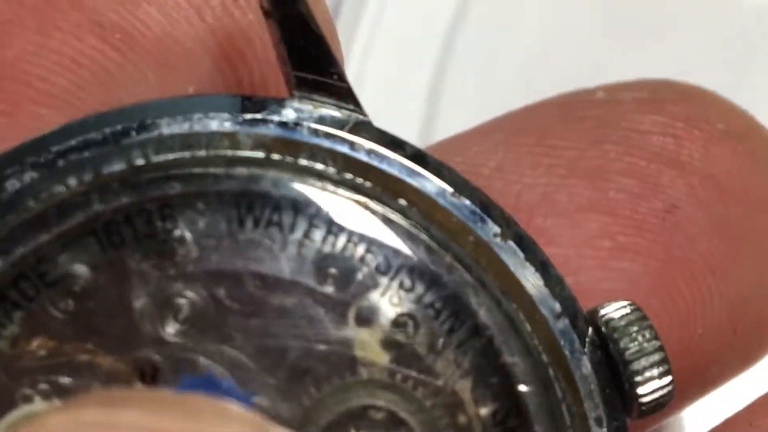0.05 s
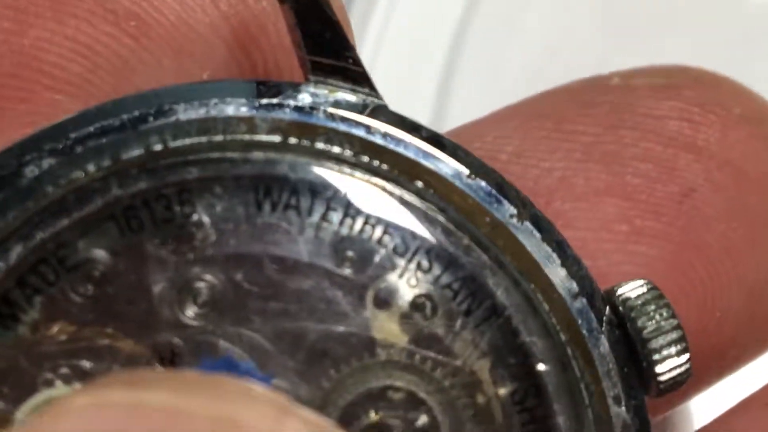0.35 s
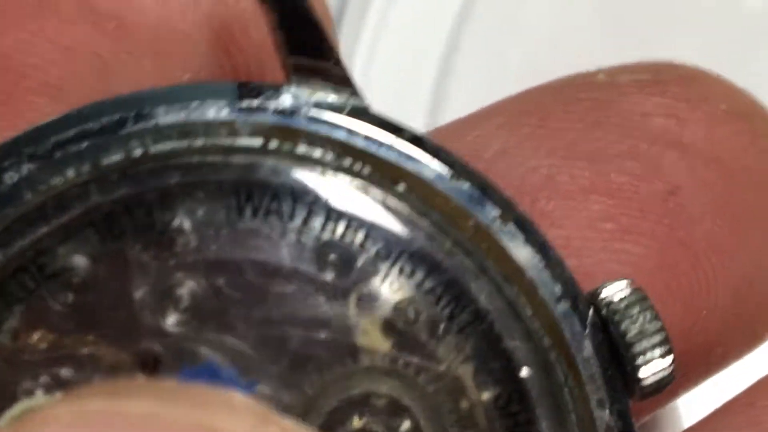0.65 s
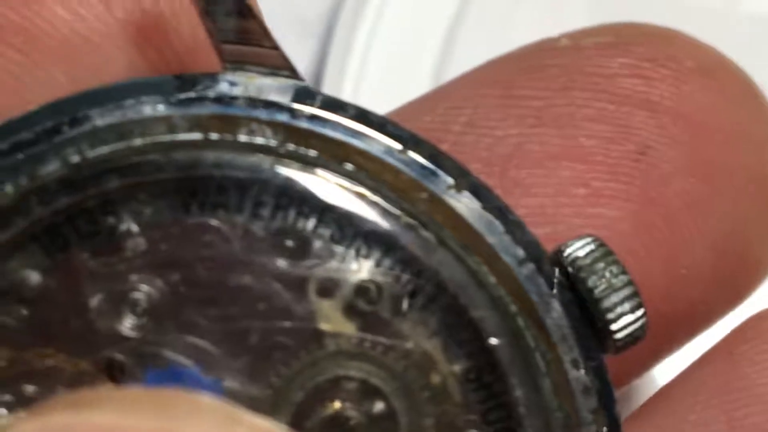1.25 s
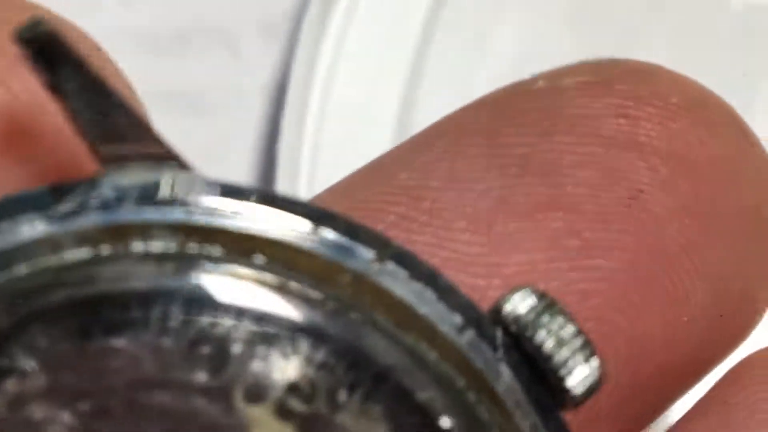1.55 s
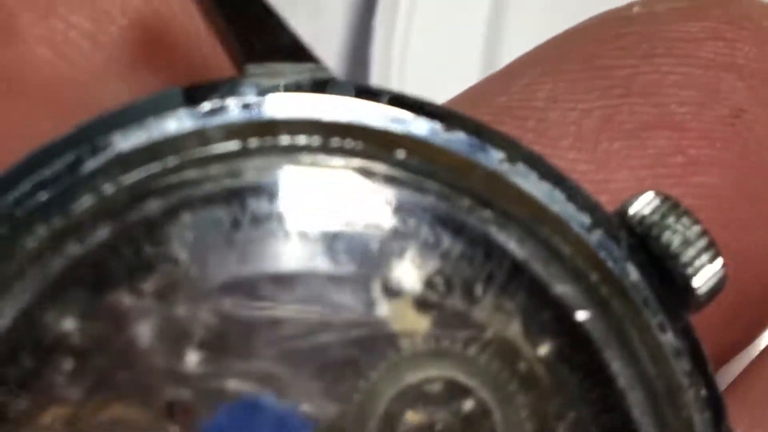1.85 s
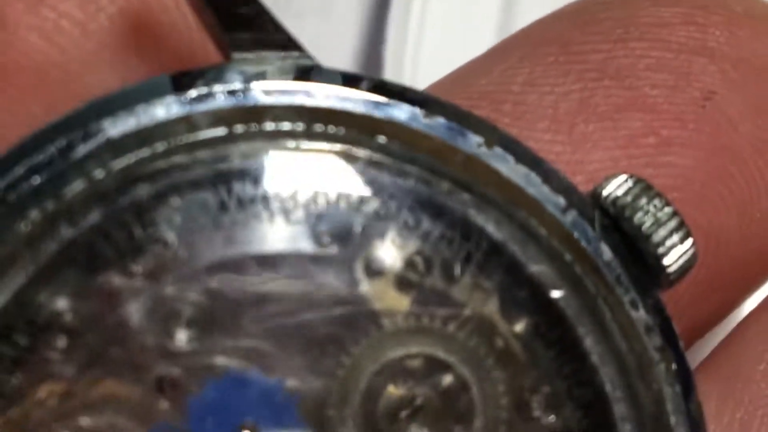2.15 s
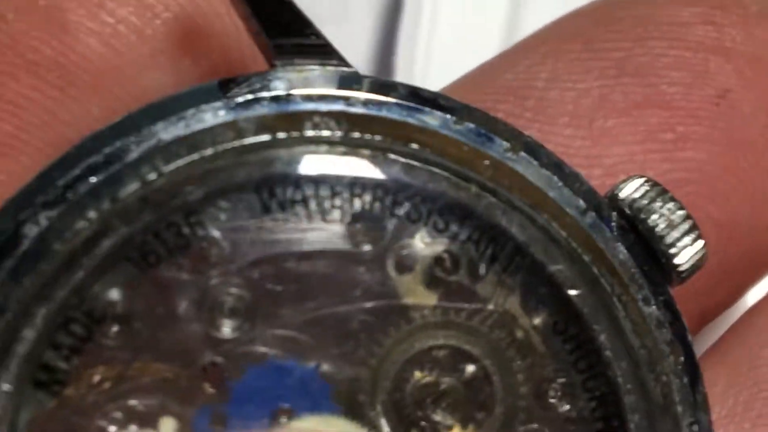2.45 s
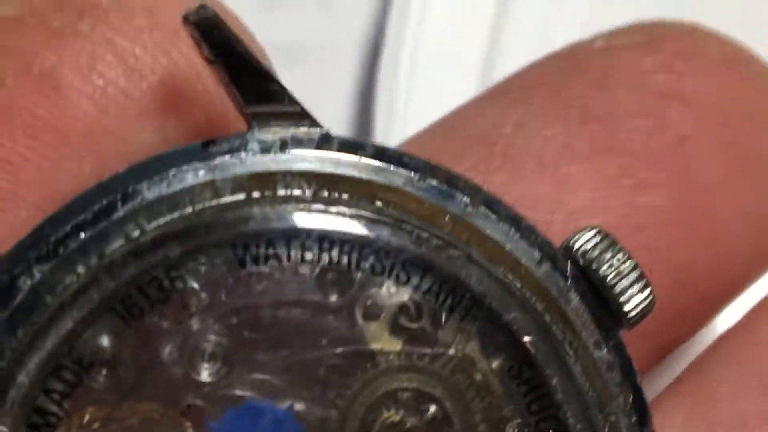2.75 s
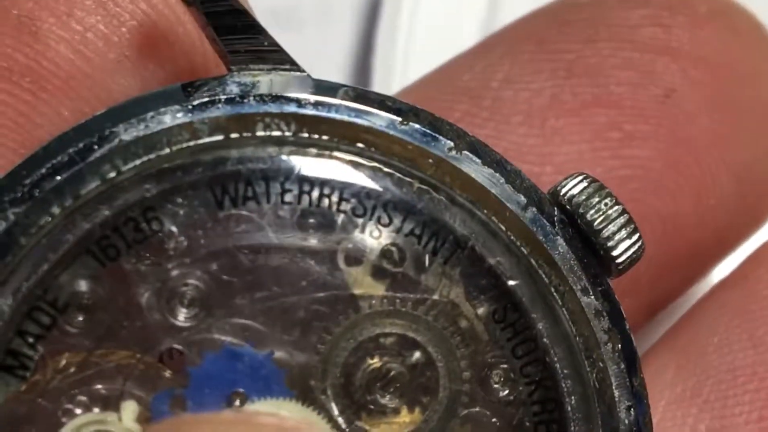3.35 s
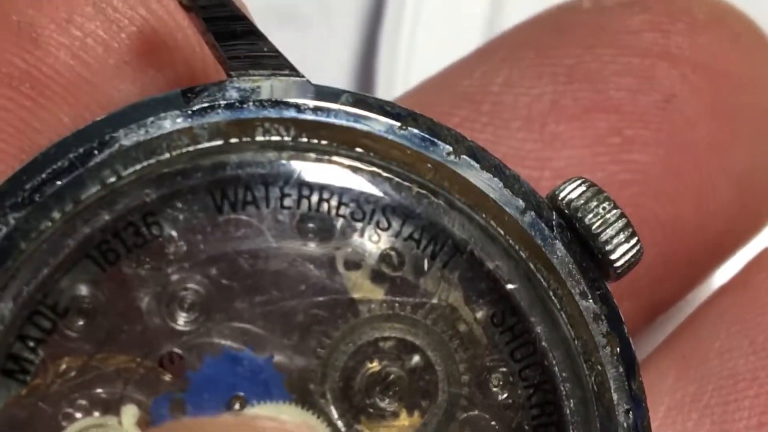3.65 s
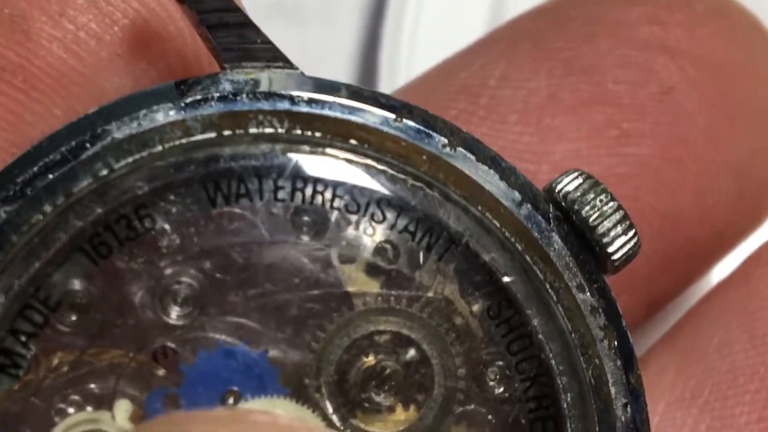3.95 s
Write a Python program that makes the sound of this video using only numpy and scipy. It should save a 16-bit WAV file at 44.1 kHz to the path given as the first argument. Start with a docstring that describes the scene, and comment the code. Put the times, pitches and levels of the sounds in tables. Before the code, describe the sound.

A mechanical wristwatch ticks close to the microphone, five light metallic beats a second, never pausing. A finger slides faintly over the case once, while low electrical hum and ventilation fill the quiet room.

```python
"""Wristwatch in a quiet room

A mechanical watch, held in the fingers close to the microphone, beats five times a second. In each
beat three tiny contacts of the escapement (unlock, impulse, lock) ring the steel case; tick and tock
differ. A finger slides softly on the case once. Behind it lie mains and motor hum and the ventilation."""
import sys
import numpy as np
from scipy import signal
from scipy.fft import rfft, irfft
from scipy.io import wavfile
from scipy.ndimage import uniform_filter1d

SR = 44100
rng = np.random.default_rng(int(sys.argv[2]) if len(sys.argv) > 2 else 0)


def materialize(psi):
    """Save the field psi as 16-bit PCM at rate SR to the path in sys.argv[1].

    A 1-D psi becomes a single channel; in a 2-D psi each row is a channel.
    """
    bounded = np.clip(np.atleast_2d(psi).T, -1, 1)
    quanta = np.round(bounded * 32767).astype(np.int16)
    wavfile.write(sys.argv[1], SR, quanta)


N = 176400

# ringing modes of case and movement: pitch_hz, width_hz, tick_gain_db, tock_gain_db
CASE_MODES = [(4000, 1600, -20, -3), (4600, 330, -19, -9.5), (5330, 190, -9, -3), (5830, 160, -6.5, -6.5),
              (6570, 180, -13, -8.5), (6980, 350, -6.5, -11), (7910, 140, -7, -10), (8700, 350, -1, -8),
              (9620, 180, -1, -4.5), (10450, 300, -15, -25), (11680, 290, -2, -4.5), (12450, 400, 2, -2.5),
              (12900, 240, -13, -9), (13550, 290, -1, -1), (13950, 350, -4.5, -8), (14250, 590, -3, -22),
              (15800, 800, -7, -1.5)]


def amp(db):
    """Decibels to gain."""
    return 10 ** (np.asarray(db) / 20)


def unit(x):
    """Scales to an rms of one."""
    return x / np.sqrt(np.mean(x ** 2) + 1e-30)


def spectrum_db(points, hz):
    """Interpolates a spectrum along a log-frequency axis."""
    point_hz, db = np.transpose(points)
    return np.interp(np.log(hz + 1), np.log(point_hz), db)


def peak_power(peaks, hz):
    """Summed power of a few resonances."""
    return sum((amp(db) / (1 + 2 * ((hz - centre) / width) ** 2)) ** 2 for centre, width, db in peaks)


def add(mix, start_s, sound):
    """Mixes a sound in at start_s."""
    part = mix[max(round(start_s * SR), 0):][:len(sound)]
    part += sound[:len(part)]


def shaped_noise(gain):
    """White noise weighted by one gain per frequency bin."""
    return irfft(rfft(rng.standard_normal(N)) * gain, N)


def drift(rate_hz):
    """Slow random motion with an rms of one."""
    hz = np.fft.rfftfreq(N, 1 / SR)
    return unit(shaped_noise(np.exp(-(hz / rate_hz) ** 2)))


def hum(waver_db=0.52):
    """Steady mains and motor tones in the room; the higher ones waver more in pitch."""
    # mains and motor tones: pitch_hz, rms_db
    tones = [(71.1, -72), (94.75, -50), (120.02, -47.5), (240.07, -66), (260.57, -66), (360.07, -60),
             (521.1, -68.5), (1383.5, -85), (1596.2, -84), (2293.6, -78), (3361, -88.5)]
    out = np.zeros(N)
    for hz, db in tones:
        pitch_waver = .0006 * np.sqrt(hz / 2300) * drift(4.3)
        turns = np.cumsum(hz * (1 + pitch_waver)) / SR + rng.random()
        out += np.sqrt(2) * amp(db + waver_db * drift(1.3)) * np.sin(2 * np.pi * turns)
    return out


def room_air(gain_db=0.5, waver_db=0.33):
    """Room tone: dull ventilation noise with a few resonances."""
    # broad spectrum of the air: frequency_hz, relative_density_db
    floor = [(15, -116), (26, -102), (38, -83), (65, -73), (140, -78), (225, -77), (275, -91.5), (330, -81),
             (410, -84), (600, -85), (780, -91.5), (930, -89.5), (1080, -96.5), (1450, -96.5),
             (1650, -94.5), (2250, -97), (2800, -104), (3200, -102), (3550, -106), (4100, -106.5),
             (4850, -114), (5600, -112), (6900, -115.5), (7600, -119.5), (8800, -118), (9900, -121),
             (10400, -126), (11100, -122.5), (12500, -123), (14500, -126), (16000, -126)]
    # resonances of room and ventilation: centre_hz, width_hz, relative_density_db
    resonances = [(162, 8.1, -79), (194, 7.3, -78), (599.4, 13, -80), (700, 16, -82.5), (874, 15, -87.5),
                  (1184, 26, -89.5)]
    hz = np.fft.rfftfreq(N, 1 / SR)
    power = amp(spectrum_db(floor, hz)) ** 2 + peak_power(resonances, hz)
    noise = shaped_noise(np.sqrt(power * SR / 2))
    return noise * amp(gain_db + waver_db * drift(4.2))


def ventilation_drone(gain_db=-0.95, smooth_samples=9000):
    """Low, steady band of ventilation noise near 350 Hz, with slight random level wander."""
    # resonances of the drone: centre_hz, width_hz, gain_db
    resonances = [(329.3, 22, -5.5), (350, 15, 0.5), (382, 15, -6)]
    # slight chance wander of its level: time_s, relative_level_db
    level_wander = [(0.0, -55), (0.33, -52), (0.67, -50.5), (1.0, -53.4), (1.33, -54), (1.67, -54.5),
                    (2.0, -51.5), (2.33, -54), (2.67, -52), (3.0, -54), (3.33, -52), (3.67, -51),
                    (4.0, -54)]
    hz = np.fft.rfftfreq(N, 1 / SR)
    noise = unit(shaped_noise(np.sqrt(peak_power(resonances, hz))))
    steady = noise / np.sqrt(uniform_filter1d(noise ** 2, smooth_samples))
    wander_db = np.interp(np.arange(N) / SR, *np.transpose(level_wander))
    return steady * amp(gain_db + wander_db)


def contact(mode_db, rise_s, hold_s, decay_s, spread_db=1.5, size=1024):
    """Steel meets jewel: a brief, uneven chatter of micro-impacts rings every mode of the case."""
    t = np.arange(size) / SR
    force = np.minimum(t / rise_s, 1) * np.exp(-np.maximum(t - rise_s - hold_s, 0) / decay_s)
    uneven = amp(spread_db * unit(uniform_filter1d(rng.standard_normal(size), size=14)))
    out = np.zeros(size)
    for (hz, width, _, _), db in zip(CASE_MODES, mode_db):
        chatter = force * uneven * rng.standard_normal(size)
        pole = np.exp((2j * np.pi * hz - np.pi * width) / SR)
        ring = signal.lfilter([1, -1], np.poly([pole, pole.conjugate()]).real, chatter)
        out += amp(db) * unit(ring)
    return unit(out) * np.sqrt(.0087 * SR / size)  # the energy of 8.7 ms at an rms of one


def escapement(gain_db=-4, unlock_db=-21, settle_db=-31, light_hold_s=.0002, firm_hold_s=.001):
    """Close to the microphone: unlock, impulse and the loud lock, on entry and exit pallets in turn."""
    # tick and tock in turn: lock_s, relative_level_db, impulse_re_lock_db, low_mode_lift_db,
    # struck_mode_hz, struck_mode_lift_db
    beats = [(.1386, -56, -8, 6, 11680, 9), (.3392, -55, -5, 0, 12900, 1),
             (.5389, -52.5, -12, 4.5, 13550, 10.5), (.7392, -55, -8, 0.5, 5830, -2),
             (.9386, -55, -6, 3, 11680, 5), (1.1394, -55.5, -9, -1, 9620, 3),
             (1.3390, -53.5, -8, 5, 13950, 12.5), (1.5394, -54.5, -9, -2, 12900, 5),
             (1.7390, -53.5, -10, 0, 12900, 4), (1.9394, -54, -8, -2, 12450, 2),
             (2.1393, -52, -9, -0.5, 10450, 13), (2.3394, -55.5, -8, -1.5, 12450, 3),
             (2.5394, -52, -15, -3, 12450, 4), (2.7397, -52, -6.5, 2, 9620, 11),
             (2.9394, -53, -9, 0, 9620, 1), (3.1398, -53.5, -9, -1, 12450, 6),
             (3.3394, -53.5, -8, 1, 13950, -1), (3.5398, -55, -7, -2, 9620, 6),
             (3.7396, -53, -13, -2, 9620, 3), (3.9399, -53.5, -6, -1, 5330, 1)]
    # time ahead of the lock, tick then tock: unlock_lead_s, impulse_lead_s
    leads = [(.0170, .0091), (.0166, .0112)]
    # shape of the chatter, tick then tock: rise_s, decay_s
    strokes = [(.0004, 0.0016), (.0009, .0009)]
    # a small slip in the wheel train: start_s, relative_level_db
    slips = [(2.1712, -70)]
    out = np.zeros(N)
    modes = np.array(CASE_MODES)
    mode_hz = modes[:, 0]
    for k, (lock_s, db, impulse_db, low_db, struck_hz, lift_db) in enumerate(beats):
        side = k % 2  # 0 tick, 1 tock
        unlock_lead, impulse_lead = leads[side]
        rise, decay = strokes[side]
        colour = modes[:, 2 + side] + low_db * (mode_hz < 7500)
        colour[np.argmin(abs(mode_hz - struck_hz))] += lift_db
        add(out, lock_s - unlock_lead, amp(db + unlock_db) * contact(colour, rise, light_hold_s, decay))
        add(out, lock_s - impulse_lead, amp(db + impulse_db) * contact(colour, rise, light_hold_s, decay))
        add(out, lock_s, amp(db) * contact(colour, rise_s=.00014, hold_s=firm_hold_s, decay_s=decay))
        if side == 0:  # the wheels settle faintly after a tick
            settle_gain = amp(db + settle_db + 1.5 * rng.standard_normal())
            add(out, lock_s + .0325, settle_gain * contact(colour, rise, firm_hold_s, decay))
    for start_s, db in slips:
        add(out, start_s, amp(db) * contact(modes[:, 2], rise_s=.0006, hold_s=.001, decay_s=.003))
    return amp(gain_db) * out


def reflections(sound, gain_db=-15, t60_s=0.05, size=6000):
    """Faint quick reflections from the hand and desk nearby."""
    tail = rng.standard_normal(size) * amp(-60 * np.arange(size) / SR / t60_s)
    return amp(gain_db) * signal.fftconvolve(sound, tail / np.linalg.norm(tail))[:N]


def finger_slide(rough_db=0.5, grain_hz=70):
    """Skin slides over the case, close up: a soft, slightly uneven hiss."""
    # rise and fall of the slide: time_s, level_db
    stroke = [(1.2, -90), (1.35, -74.5), (1.5, -70.5), (1.6, -71), (1.75, -75.5), (1.95, -95)]
    # spectrum of skin on steel: frequency_hz, gain_db
    colour = [(1500, -44), (2900, -4), (3700, 6), (5300, -10.5), (6700, -4), (7700, -12), (8900, -6.5),
              (10500, -17), (11400, -14), (14000, -25), (15500, -13)]
    hz = np.fft.rfftfreq(N, 1 / SR)
    hiss = unit(shaped_noise(amp(spectrum_db(colour, hz))))
    stroke_db = np.interp(np.arange(N) / SR, *np.transpose(stroke))
    return hiss * amp(stroke_db + rough_db * drift(grain_hz))


def scene():
    """One microphone: the watch in front, the room behind."""
    watch = escapement()
    foreground = watch + reflections(watch) + finger_slide()
    room = hum() + room_air() + ventilation_drone()
    return (foreground + room)[None]


def record(dry):
    """The recorder's band limit cuts the top treble steeply."""
    lowpass = signal.firwin(511, cutoff=15880, window=("kaiser", 9), fs=SR)
    return signal.oaconvolve(dry, lowpass[None], "same")


dry = scene()
out = record(dry)
materialize(out)
```